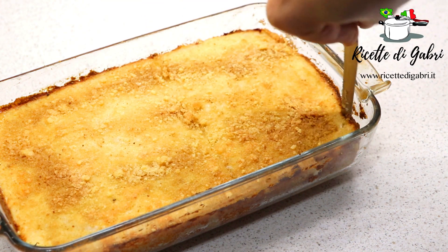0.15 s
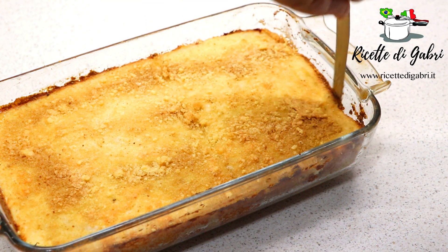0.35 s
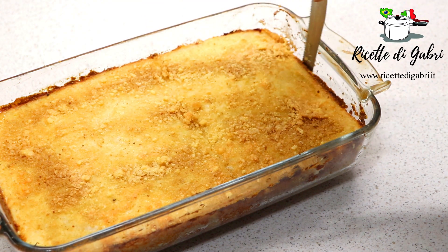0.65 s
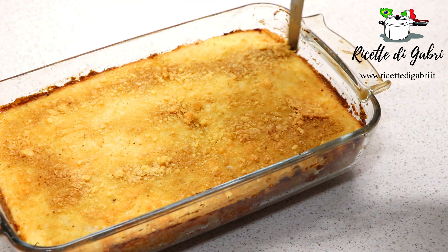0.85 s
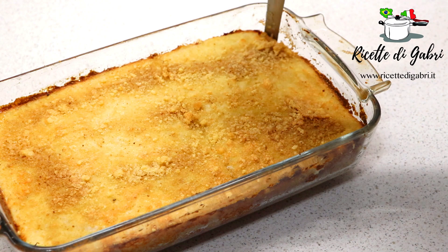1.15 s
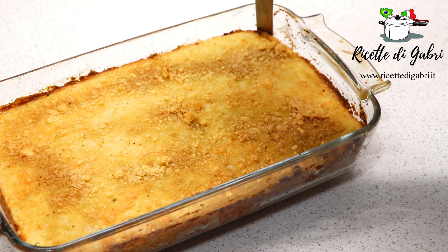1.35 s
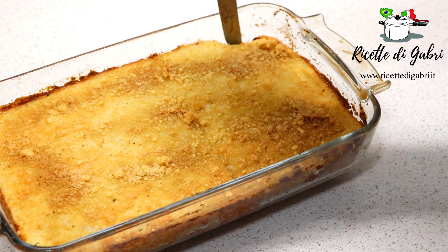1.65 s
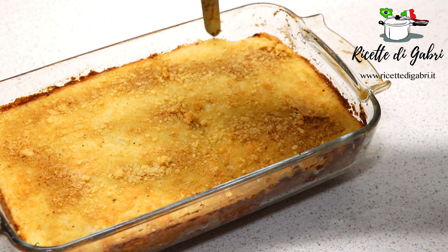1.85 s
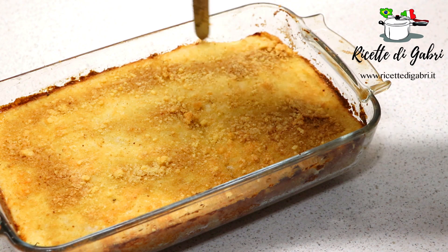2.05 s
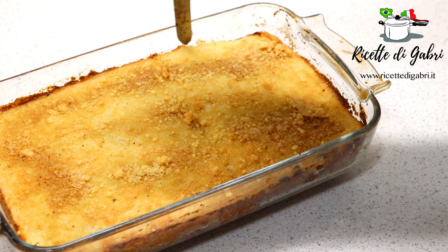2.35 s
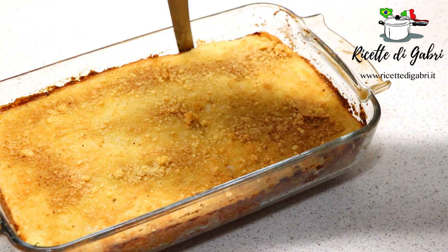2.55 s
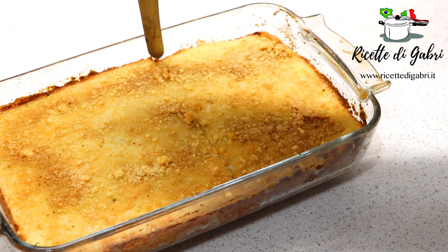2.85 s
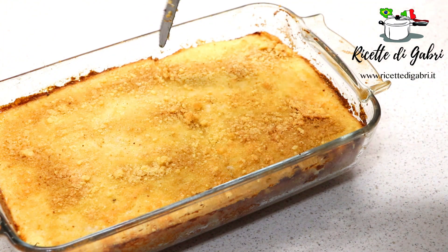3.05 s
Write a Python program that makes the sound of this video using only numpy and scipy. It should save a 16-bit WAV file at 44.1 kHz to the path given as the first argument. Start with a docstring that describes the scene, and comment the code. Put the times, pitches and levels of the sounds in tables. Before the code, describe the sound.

A table knife loosens a crusty bake in a glass dish, heard close in a lightly reverberant kitchen. Short gritty rasps and crumb snaps crowd the first 1.5 seconds, with clicks and a brief squeak near 0.2. Sharp clicks and knocks come around 0.8, 1.25 and 1.4, the heaviest thud with a glassy clink at 1.75. Sparser scrapes follow, then a busy click-and-thud cluster around 2.8, over soft low hiss.

```python
"""In a kitchen, close up, a table knife is worked around the edge of a crusty bake in a glass dish.
The blade rasps through crust in short strokes (gated grains and crumb snaps), clicks, and judders in short squeaks.
Bumped, the heavy dish knocks and thuds as damped sines and the worktop rumbles as decaying noise.
Blade and glass ring through resonators; the room adds a noise tail over a steady, low-weighted hiss."""
import sys
import numpy as np
from scipy import signal
from scipy.fft import rfft, irfft
from scipy.io import wavfile
from scipy.ndimage import uniform_filter1d

SR = 44100
rng = np.random.default_rng(int(sys.argv[2]) if len(sys.argv) > 2 else 0)


def inscribe(sig):
    """Save sig as 16-bit PCM at rate SR to the path in sys.argv[1].

    A 1-D sig is mono; a 2-D sig holds one channel per row.
    Samples are clipped to [-1, 1] before scaling.
    """
    pcm = np.round(np.clip(np.atleast_2d(sig).T, -1, 1) * 32767)
    wavfile.write(sys.argv[1], SR, pcm.astype(np.int16))


N = 141120

# Rasping strokes. Each row: start in seconds, length in seconds, middle, upper and treble level in relative dB.
STROKES = [(0.085, 0.021, -51.5, -50.5, -45), (0.162, 0.045, -56, -55, -52), (0.203, 0.023, -33, -43, -32),
           (0.253, 0.0333, -41.5, -40, -48), (0.342, 0.075, -44.5, -46.5, -48),
           (0.42, 0.018, -35, -31.5, -36), (0.459, 0.024, -36, -40.5, -45), (0.513, 0.047, -47.5, -48, -50),
           (0.653, 0.014, -48.5, -39, -49), (0.681, 0.026, -43, -43, -49), (0.716, 0.023, -43, -41, -44),
           (0.764, 0.037, -43, -37.5, -44), (0.887, 0.023, -43, -50, -53), (0.98, 0.0078, -50, -49, -39),
           (1.007, 0.019, -39, -28.5, -33), (1.036, 0.028, -34.5, -36.5, -46),
           (1.112, 0.031, -38.5, -45.5, -49), (1.258, 0.0054, -35, -40, -52),
           (1.277, 0.04, -40, -39.5, -46), (1.371, 0.022, -42, -34.5, -34.5), (1.384, 0.1, -63, -50.5, -50),
           (1.494, 0.062, -47.5, -46, -46), (1.61, 0.056, -43, -48, -49), (1.991, 0.024, -44, -49, -54),
           (2.052, 0.04, -54.5, -50, -53), (2.182, 0.071, -45, -50, -59), (2.265, 0.05, -45, -51.5, -49.5),
           (2.356, 0.01, -44.5, -45.5, -48), (2.433, 0.052, -54, -55.5, -53.5),
           (2.506, 0.024, -42, -48.5, -56), (2.527, 0.013, -36, -58, -51),
           (2.545, 0.07, -42.5, -43.5, -42.5), (2.633, 0.019, -47.5, -47, -49),
           (2.714, 0.11, -50, -55, -58), (2.771, 0.019, -40.5, -40, -50), (2.812, 0.021, -36.5, -42, -48),
           (2.836, 0.033, -34.5, -37.5, -37.5), (3.015, 0.014, -44.5, -58, -64),
           (3.08, 0.012, -45.5, -55, -46)]
# Sharp blade clicks. Each row: start in seconds, decay in seconds, middle, upper and treble level in relative dB.
BLADE_CLICKS = [(0.2098, 0.0096, -27.5, -30, -48), (0.233, 0.0057, -52, -32.5, -29),
                (0.258, 0.0046, -55, -53, -28.5), (0.423, 0.0039, -36, -41, -43),
                (0.4798, 0.0042, -37, -33, -52), (0.7793, 0.0014, -36, -20.5, -53),
                (0.7918, 0.00055, -28, -27, -51), (1.014, 0.00066, -59, -27, -46),
                (1.0205, 0.00045, -27, -28, -27), (1.0315, 0.0041, -27, -29, -43),
                (1.2234, 0.0076, -35.5, -36.5, -25.5), (1.3844, 0.0043, -31.5, -43, -19.5),
                (1.386, 0.00015, -28.5, -17, -23), (1.516, 0.00078, -67, -32, -35),
                (1.5419, 0.0052, -38, -42, -35), (1.7159, 0.0066, -30.5, -41, -41),
                (1.7468, 0.0083, -31.5, -40.5, -37), (1.797, 0.0013, -25, -34, -23),
                (1.808, 0.0055, -31.5, -35.5, -25), (2.064, 0.0038, -48, -47, -38.5),
                (2.171, 0.007, -56, -43, -37.5), (2.553, 0.001, -60, -53, -33.5),
                (2.61, 0.0017, -46, -64, -31.5), (2.795, 0.0059, -29.5, -35, -29.5),
                (2.8558, 0.00074, -58, -28, -41), (2.865, 0.0016, -34, -29.5, -35)]
# Dull bumps on the dish. Each row: start in seconds, pitch in Hz, knock and worktop rumble level in relative dB.
DISH_BUMPS = [(0.019, 332, -46.5, -52.5), (.211, 600, -37.5, -39), (0.223, 247, -37, -53),
              (.278, 394, -39, -63), (.358, 390, -41.5, -44.5), (0.387, 334, -43.5, -57),
              (0.471, 488, -32, -42.5), (0.719, 334, -41.5, -56), (0.782, 335, -44, -39.5),
              (1.032, 415, -38.5, -44), (1.242, 341, -29, -38.5), (1.246, 600, -35, -50),
              (1.2832, 318, -34.5, -63), (1.323, 247, -38, -56), (1.409, 290, -39, -50),
              (1.476, 358, -36.5, -43.5), (1.526, 374, -37, -45.5), (1.539, 460, -36, -59),
              (1.624, 530, -41, -41.5), (1.7473, 413, -25, -37.5), (2.007, 347, -38, -48),
              (2.195, 528, -44, -61), (2.3, 352, -38.5, -49), (2.527, 343, -42.5, -44),
              (2.566, 373, -39, -44.5), (2.821, 336, -33, -41), (2.862, 387, -40, -36.5)]
# Pushed dish rocking on the worktop. Each row: start in seconds, pitch in Hz, level in dB.
DISH_THUDS = [(.222, 166, -30), (.799, 129, -32), (1.247, 125, -34), (1.479, 130, -38), (1.752, 156, -24),
              (2.007, 150, -39), (2.848, 148, -26.5)]
# Edges of the middle, upper and treble bands in Hz.
BAND_EDGES_HZ = (850, 2800, 7000, 15800)
# Ringing of glass and blade. Each row: frequency in Hz, peak level in relative dB, t60 in seconds.
RING_MODES = [(600, 5, .07), (1075, 1.5, .04), (1545, 0, .05), (1675, 0, .06), (1832, 0, .3),
              (2398, 0, .26), (2410, -2, .03), (2620, -4, .18), (3020, -2, .04), (3260, -3, .08),
              (3830, -6, .025), (4900, -7, .03), (5780, -7, .04), (6420, -3, .035), (7260, -6, .06),
              (7690, -6, .04), (8340, -1.5, .02), (11350, -3, .03)]
# Colour of the blade's contact. Each row: frequency in Hz, gain in dB.
CONTACT_COLOUR = [(300, -4.5), (600, 2.5), (800, -1.5), (1100, -2), (2500, -2), (4500, -2.5), (6500, -1.5),
                  (8600, 2), (10000, -5), (11500, -7.5), (13000, -3), (16000, -10.5)]
# Colour of the worktop's rumble. Each row: frequency in Hz, relative gain in dB.
WORKTOP_COLOUR = [(20, -49), (33, -9), (47, 0), (70, 2), (95, -1.5), (125, 3), (160, 3), (200, -21),
                  (300, -6), (600, -39)]
# Colour of the kitchen background. Each row: frequency in Hz, relative density in dB per Hz.
BACKGROUND_COLOUR = [(25, -1.5), (48, 8), (188, 2.5), (331, 8), (598, -4.5), (722, -4), (1050, -4),
                     (2700, -17.5), (3830, -16.5), (4380, -13.5), (8350, -20), (15500, -17)]
# Light drag of the blade under the strokes. Each row: time in seconds, level in relative dB.
DRAG_LEVEL = [(0, -51.5), (.17, -62.5), (.3, -52.5), (.55, -49.5), (.63, -53), (1.1, -52), (1.201, -58),
              (1.3, -54), (1.6, -51), (1.701, -59), (1.88, -51), (2.14, -58), (2.3, -56), (2.48, -59.5),
              (2.7, -52.5), (2.949, -59), (3.2, -64)]
# Kitchen reverberation. Each row: low edge in Hz, high edge in Hz, t60 in seconds, level in dB.
ROOM_BANDS = [(97, 730, 0.34, -18), (705, 3660, 0.69, -18.5), (3150, 15900, 0.34, -14.5)]
# Blade catching and juddering. Each row: start in seconds, nominal pitch in Hz, level in dB, decay in seconds.
BLADE_JUDDERS = [(.169, 586, -42.5, 0.011), (.207, 605, -23, 0.01), (.208, 2390, -31, .006),
                 (0.208, 1420, -26, 0.0038), (.208, 1690, -48, .014), (.429, 624, -30, 0.013),
                 (.431, 1675, -33.5, .012), (1.225, 8950, -23, 0.0024), (1.7146, 3700, -21, 0.0016),
                 (1.746, 1190, -20.5, 0.0023), (2.004, 1065, -38.5, 0.0069), (2.198, 1120, -39.5, 0.0078),
                 (2.236, 1038, -33, 0.0095), (2.527, 1130, -28, 0.003), (3.019, 1550, -35.5, 0.0047),
                 (3.083, 1074, -41, 0.0059)]
# Blade riding on the glass wall: thinner rasp, louder modes. Each row: start in seconds, end in seconds.
WALL_SPANS = [(.15, 0.44), (2.489, 2.8)]
# Blade meeting bare glass. Each row: start in seconds, level in dB before the mode's own level.
BARE_GLASS_TAPS = [(0.207, -53), (0.426, -55), (1.713, -57), (1.746, -43.5), (2.794, -54)]

BACKGROUND_DB = -51.5
GRAINS_PER_S, GRAIN_SPREAD_DB, SMOOTH_SHARE = 1500, 6, .4
SLIP_POINTS_PER_S, SLIP_DB = 150, 2.5
CRUMB_SHARE, CRUMBS_PER_S_PER_BAND = 2, 150
SCRAPE_ATTACK_S, SCRAPE_RELEASE_S, SCRAPE_DB, SCRAPE_BODY_DB = 0.0018, 0.0034, -3.5, -6
CLICK_DB, SNAP_GAIN = -0.5, 3.76
KNOCK_RISE_S, KNOCK_DECAY_S, KNOCK_DB, KNOCK_ROOM_DB = .0015, .0052, 12, -3.5
SHUDDER_DECAY_S, SHUDDER_DB = .006, -6
RUMBLE_RISE_S, RUMBLE_DECAY_S, RUMBLE_DB = 0.0017, 0.029, 5
THUD_RISE_S, THUD_DECAY_S = 0.0035, 0.013
JUDDER_RISE_S, JUDDER_WOBBLE = 0.0003, 0.02
RING_DB, GLASS_MIN_T60_S = 1, .12
WALL_RASP_DB, WALL_RING_DB = -5, 4.5
WIDTH_DB, TOP_HZ = -50.5, 15700


def undb(db):
    """Decibels to gain."""
    return 10 ** (np.asarray(db) / 20)


def unit(x):
    """Scale to rms 1."""
    return x / np.sqrt(np.mean(x ** 2))


def band(x, lo_hz, hi_hz, order=2):
    """Causal Butterworth band-pass."""
    sos = signal.butter(order, [lo_hz, min(hi_hz, SR / 2.1)], 'band', fs=SR, output='sos')
    return signal.sosfilt(sos, x + 1e-18)


def colour(x, points, size=4096):
    """Minimum-phase filter through (Hz, dB) points."""
    hz, db = np.array(points).T
    freq = np.maximum(np.fft.rfftfreq(size, 1 / SR), 1)
    gain = undb(np.interp(np.log(freq), np.log(hz), db))
    # fold the cepstrum to make the filter causal
    cepstrum = irfft(np.log(gain))
    cepstrum[1:size // 2] *= 2
    cepstrum[size // 2 + 1:] = 0
    impulse = irfft(np.exp(rfft(cepstrum)))
    return signal.fftconvolve(x, impulse)[:N]


def walk(points_per_s):
    """Random wander, linear between normal draws, with a spread near 1."""
    points = rng.standard_normal(N)
    return np.interp(np.arange(N) * points_per_s / SR, np.arange(N), points)


def since(start_s):
    """Seconds since start, zero before it."""
    return np.maximum(np.arange(N) / SR - start_s, 0)


def strike(start_s, rise_s, decay_s):
    """Envelope of a blow: quick rise and exponential fall."""
    out, first = np.zeros(N), int(start_s * SR)
    age = np.arange(min(int(20 * decay_s * SR), N - first)) / SR
    out[first:first + len(age)] = (1 - np.exp(-age / rise_s)) * np.exp(-age / decay_s)
    return out


def background():
    """Steady kitchen hiss: coloured noise, densest in the lows."""
    return undb(BACKGROUND_DB) * unit(colour(rng.standard_normal(N), BACKGROUND_COLOUR))


def grit():
    """Dense tiny fractures of uneven size plus smooth friction, bunched by stick and slip."""
    hit = rng.random(N) < GRAINS_PER_S / SR
    size = undb(GRAIN_SPREAD_DB * np.minimum(rng.standard_normal(N), 2))
    grains = hit * rng.choice([-1, 1], N) * size
    friction = unit(grains) + SMOOTH_SHARE * rng.standard_normal(N)
    return unit(friction * undb(SLIP_DB * walk(SLIP_POINTS_PER_S)))


def crumbs(lo_hz, hi_hz, count):
    """Crumbs snap one by one: sparse impulses in each of several pitch bands."""
    edges, out = np.geomspace(lo_hz, hi_hz, count + 1), 0
    for lo, hi in zip(edges[:-1], edges[1:]):
        hit = rng.random(N) < CRUMBS_PER_S_PER_BAND / SR
        snaps = hit * rng.choice([-1, 1], N) * (.5 + rng.random(N))
        out = out + band(snaps, lo, hi, order=1)
    return unit(out)


def drag():
    """Grit and crumbs crackle faintly along the moving blade."""
    s, db = np.array(DRAG_LEVEL).T
    crackle = unit(band(grit(), 660, 7800, order=1)) + crumbs(900, 12500, count=5)
    return unit(crackle) * undb(np.interp(np.arange(N) / SR, s, db))


def ring(force):
    """Glass and blade ring: contact force drives one decaying resonator per mode."""
    out = 0
    for hz, db, t60_s in RING_MODES:
        radius = np.exp(-np.log(1000) / (t60_s * SR))
        pole = radius * np.exp(2j * np.pi * hz / SR)
        mode = signal.lfilter([1], [1, -pole], force + 1e-18).real
        out = out + 2 * (1 - radius) * undb(db) * mode
    return out * undb(RING_DB)


def kitchen(x):
    """Diffuse room tail: decaying noise bands, longest in the middle."""
    tail = 0
    for lo, hi, t60_s, db in ROOM_BANDS:
        part = band(rng.standard_normal(N), lo, hi) * strike(0.011, 0.0017, t60_s / np.log(1000))
        tail = tail + undb(db) * part / np.sqrt(np.sum(part ** 2))
    return signal.fftconvolve(x, tail)[:N]


def bumps():
    """The filled dish gives a damped knock and a noisy shudder; the worktop rumbles after it."""
    knock, shudder, rumble = 0, 0, 0
    for s, hz, db, low_db in DISH_BUMPS:
        tone = np.sin(2 * np.pi * hz * since(s))
        knock = knock - undb(db) * strike(s, KNOCK_RISE_S, KNOCK_DECAY_S) * tone
        shudder = shudder + undb(db) * strike(s, KNOCK_RISE_S, SHUDDER_DECAY_S)
        rumble = rumble + undb(low_db) * strike(s, RUMBLE_RISE_S, RUMBLE_DECAY_S)
    shudder_noise = unit(band(rng.standard_normal(N), 312, 750))
    dish = undb(KNOCK_DB) * knock + undb(SHUDDER_DB) * shudder * shudder_noise
    worktop_noise = unit(colour(rng.standard_normal(N), WORKTOP_COLOUR))
    return dish + undb(RUMBLE_DB) * rumble * worktop_noise


def scrapes():
    """Each stroke presses the blade through crust with its own brightness and shakes the dish a little."""
    grains, out, gates = grit(), 0, []
    for s, length_s, *_ in STROKES:
        attack = 1 - np.exp(-since(s) / SCRAPE_ATTACK_S)
        release = np.exp(-np.minimum(since(s + length_s) / SCRAPE_RELEASE_S, 20))
        gates.append(attack * release)
    # one pressure curve per band
    pressure = undb(np.array(STROKES)[:, 2:]).T @ np.array(gates)
    for k, (lo, hi) in enumerate(zip(BAND_EDGES_HZ[:-1], BAND_EDGES_HZ[1:])):
        snaps = unit(band(crumbs(lo, hi, count=7), lo, hi))
        # grain polarity alternates from band to band
        rasp = (-1) ** k * unit(band(grains, lo, hi)) + CRUMB_SHARE * snaps
        out = out + pressure[k] * unit(rasp)
    body = undb(SCRAPE_BODY_DB) * pressure[0] * unit(band(grains, 253, 590))
    return (out + body) * undb(SCRAPE_DB)


def judders():
    """Short squeaks of the catching blade: decaying sines wobbling in pitch."""
    warped_s = np.cumsum(1 + JUDDER_WOBBLE * walk(300)) / SR
    out = 0
    for s, hz, db, decay_s in BLADE_JUDDERS:
        squeak = np.sin(2 * np.pi * hz * (warped_s - warped_s[int(s * SR)]))
        out = out + undb(db) * strike(s, JUDDER_RISE_S, decay_s) * squeak
    return out


def glass():
    """Taps on the bare wall excite the long-lived modes of the dish."""
    out = 0
    for s, tap_db in BARE_GLASS_TAPS:
        for hz, db, t60_s in RING_MODES:
            if t60_s > GLASS_MIN_T60_S:
                envelope = strike(s, 0.0004, t60_s / np.log(1000))
                out = out + undb(tap_db + db) * envelope * np.sin(2 * np.pi * hz * since(s))
    return out


def clicks():
    """A snap impulse with decaying random chatter of the blade, levelled per band."""
    chatter, out = rng.choice([-1., 1.], N), 0
    for k, (lo, hi) in enumerate(zip(BAND_EDGES_HZ[:-1], BAND_EDGES_HZ[1:])):
        force = np.zeros(N)
        for s, decay_s, *db in BLADE_CLICKS:
            force += undb(db[k]) * chatter * strike(s, .0001, decay_s)
            force[int(s * SR)] += undb(db[k]) * SNAP_GAIN
        # bandwidth compensation; polarity alternates from band to band
        out = out + (-1) ** k * band(force, lo, hi) * np.sqrt(SR / 2 / (hi - lo))
    return out * undb(CLICK_DB)


def thuds():
    """The weight of the dish swings briefly on the worktop: low damped sines."""
    out = 0
    for s, hz, db in DISH_THUDS:
        swing = np.sin(2 * np.pi * hz * since(s))
        out = out + undb(db) * strike(s, THUD_RISE_S, THUD_DECAY_S) * swing
    return out


def scene():
    """Knife, dish and room, almost the same in both channels."""
    contact = colour(scrapes() + clicks() + drag(), CONTACT_COLOUR)
    hiss = background()
    on_wall = sum(1. * (since(a) > 0) * (since(b) == 0) for a, b in WALL_SPANS)
    wall = uniform_filter1d(on_wall, size=882)  # 20 ms edges
    rasp = contact * undb(WALL_RASP_DB * wall)
    blade = rasp + ring(contact * undb(WALL_RING_DB * wall))
    knocks = bumps()
    rest = blade + thuds() + judders() + glass()
    mid = knocks + rest + kitchen(rest + undb(KNOCK_ROOM_DB) * knocks) + hiss
    side = undb(WIDTH_DB) * np.std(mid) * unit(kitchen(mid))
    return np.array([mid + side, mid - side])


def record(dry):
    """Steep elliptic low-pass cuts the top."""
    return signal.sosfilt(signal.ellip(10, .2, 80, TOP_HZ, fs=SR, output='sos'), dry)


dry = scene()
out = record(dry)
inscribe(out)
```